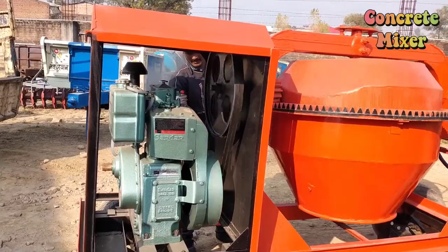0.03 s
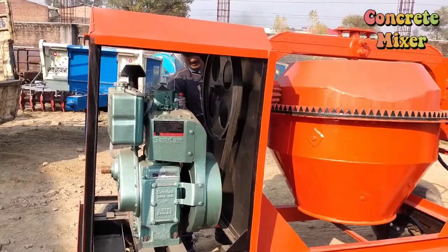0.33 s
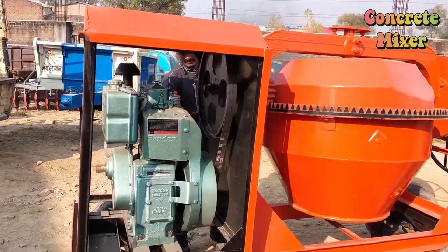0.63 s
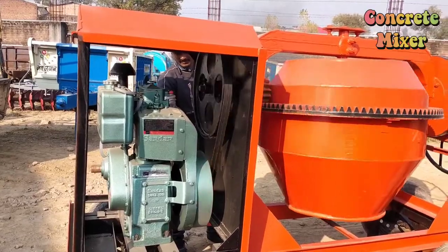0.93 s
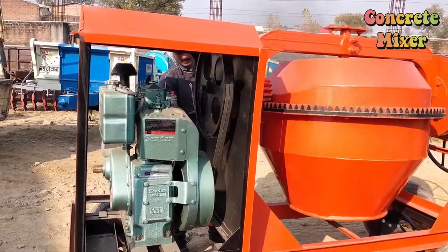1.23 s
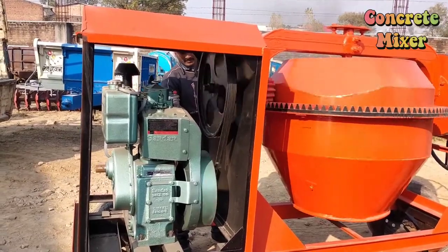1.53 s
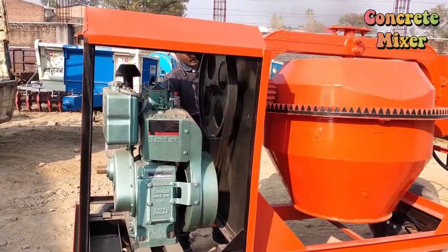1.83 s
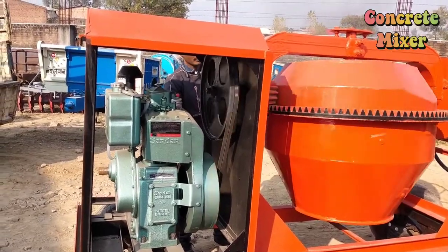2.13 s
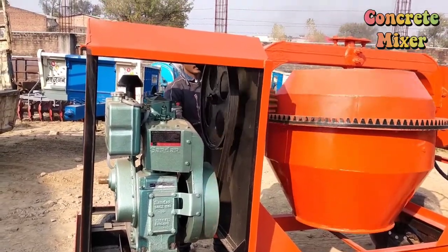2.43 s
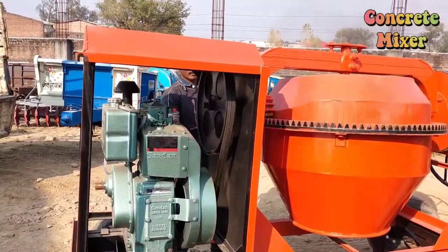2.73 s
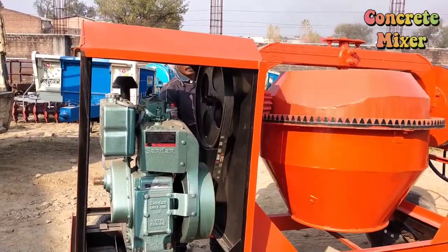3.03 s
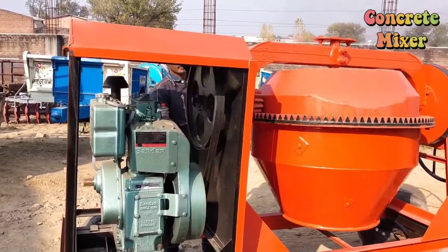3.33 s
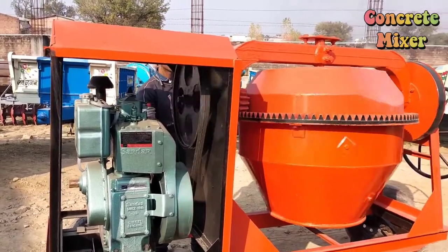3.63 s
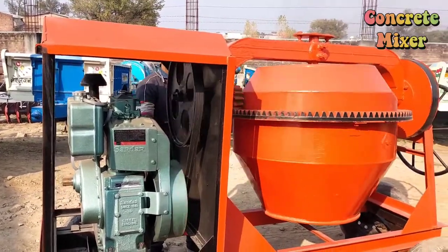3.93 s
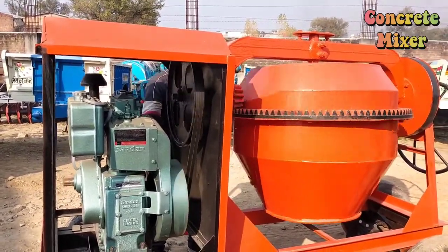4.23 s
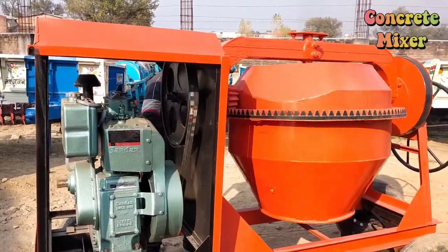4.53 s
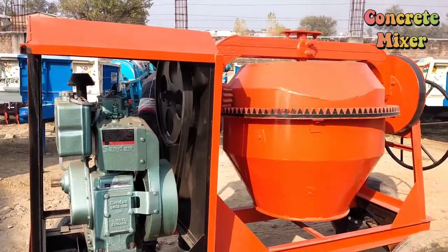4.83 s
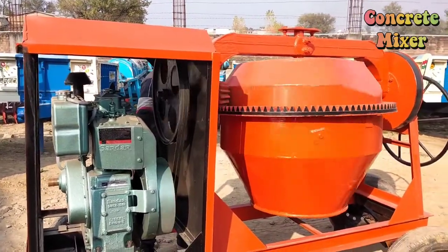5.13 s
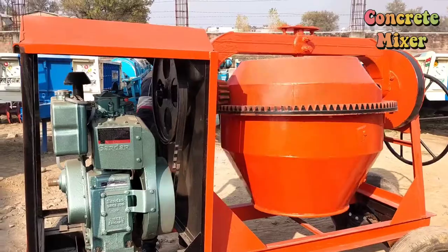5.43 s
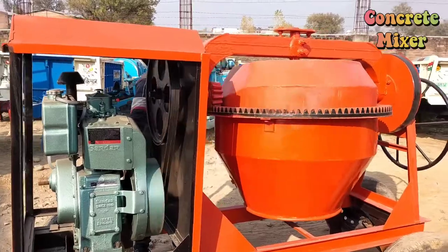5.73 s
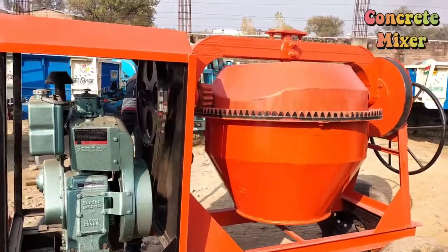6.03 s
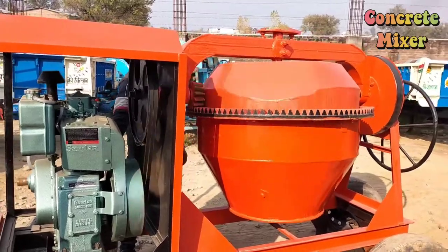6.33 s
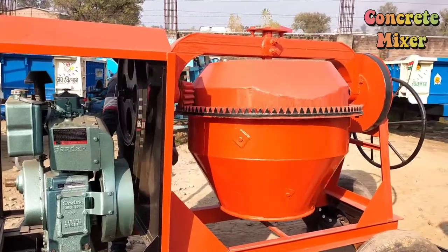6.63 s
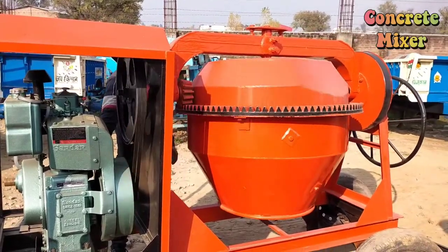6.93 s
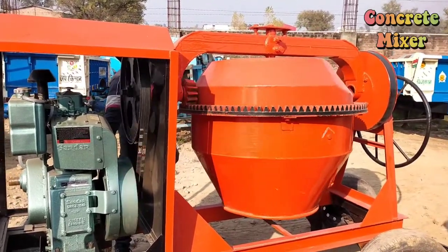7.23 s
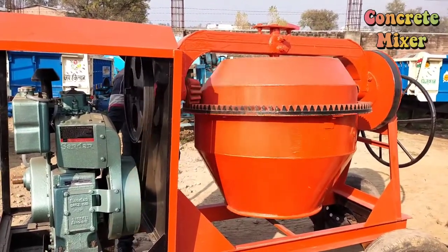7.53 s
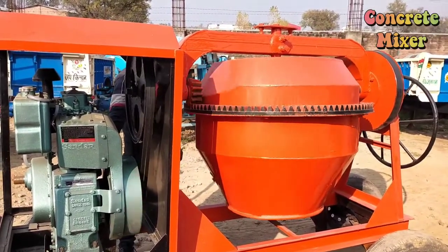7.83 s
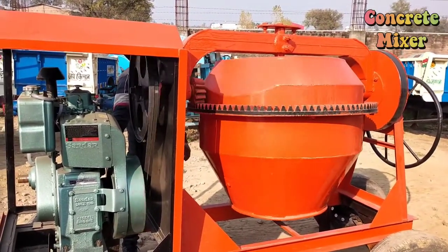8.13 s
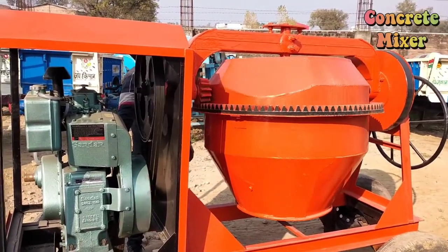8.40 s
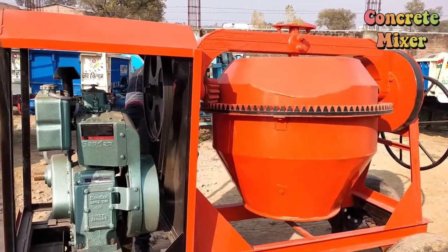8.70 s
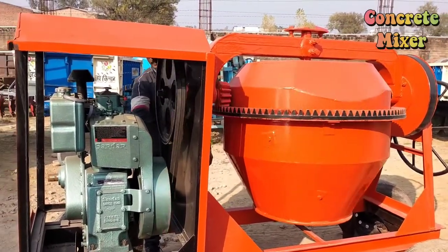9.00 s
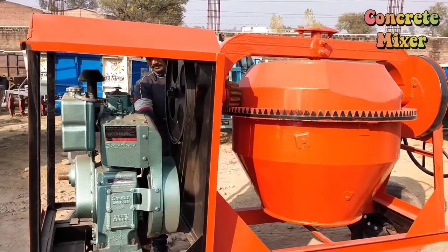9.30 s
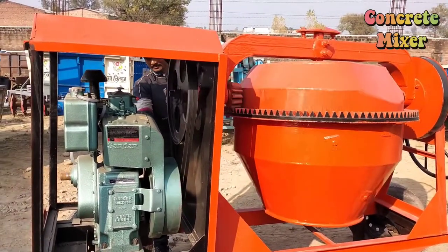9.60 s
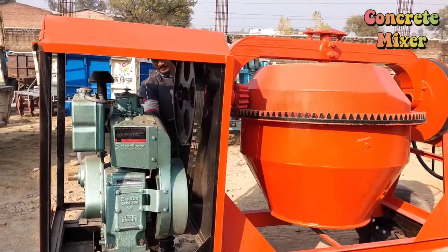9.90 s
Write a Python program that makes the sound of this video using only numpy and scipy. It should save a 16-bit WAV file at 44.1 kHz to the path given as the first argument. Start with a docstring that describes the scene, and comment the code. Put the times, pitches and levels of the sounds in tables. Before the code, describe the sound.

Shrill metal screeching and a quick run of clangs come from a concrete mixer as its drive slips. It settles into a fast rhythm of engine ticks, rasping gears and hollow drum rattle, with occasional harder jolts and slight outdoor echoes. Then the engine cuts out and the machine winds down, growing quieter, with scattered short, high squeaks and slowing ticks over a soft, sinking hum.

```python
"""A single-cylinder diesel drives the empty steel drum of a concrete mixer in an open yard.
At first the drive slips and screeches; it grips at 0.8 s. Each cycle the valves tick twice and the
power stroke jolts the drive, so that the gears grind and set the drum ringing. Firing stops at 5 s:
the mixer coasts, rattling, ticking and squeaking. From 6.5 s a low hum comes up as the engine slows."""
import sys
import numpy as np
from scipy import signal
from scipy.fft import rfft, irfft, next_fast_len
from scipy.io import wavfile

SR = 44100
rng = np.random.default_rng(int(sys.argv[2]) if len(sys.argv) > 2 else 0)


def transcribe(u):
    """Save the signal u as a 16-bit wav file named by the first command-line argument.

    u: samples, shape (n,) or (channels, n), limited to [-1, 1]; the rate is SR.
    q: integer samples, one column per channel.
    """
    v = np.clip(np.atleast_2d(u).T, -1, 1)
    q = np.round(v * 32767).astype(np.int16)
    wavfile.write(sys.argv[1], SR, q)


N = 439236
TIME = np.arange(N) / SR
FIRST_CYCLE_S, FIRING_ENDS_S = .088, 5.0

# Table levels are relative; each layer adds its own gain.
# engine speed: t/s, rate/(cycles/s)
ENGINE_SPEED = [(0.0, 10.62), (0.75, 11.15), (1.6, 10.22), (2.7, 9.79), (3.35, 9.99), (5.0, 10.0),
                (6.8, 7.67), (7.1, 7.53), (7.45, 6.82), (9.96, 3.97)]
# teeth jumping: t/s, length/s, thump/dB, clang/dB, rasp/dB, squeak/dB
HARD_JOLTS = [(0.036, 0.038, -22, -16, -20.5, -26.5), (0.132, 0.036, -24.5, -14, -21, -25.5),
              (0.227, 0.03, -18.5, -14.5, -19.5, -26.5), (0.32, 0.017, -22, -17.5, -20.5, -31),
              (0.408, 0.026, -28.5, -22, -27, -26), (2.212, 0.029, -29, -36, -42, -29),
              (2.313, 0.021, -40, -38, -48, -29.5), (2.621, 0.017, -20.5, -18, -34.5, -28),
              (2.718, 0.021, -27.5, -28.5, -38, -41), (2.924, 0.022, -29.5, -28, -36.5, -38),
              (3.125, 0.03, -26, -27, -44.5, -29.5), (3.224, 0.032, -26.5, -25, -45, -28),
              (3.326, 0.024, -26.5, -24.5, -38.5, -28), (4.426, 0.027, -31.5, -20, -40.5, -26),
              (4.927, 0.024, -27.5, -25.5, -38, -32.5), (6.402, 0.04, -58, -40, -71, -71),
              (6.785, 0.017, -40, -45.5, -50, -53), (7.175, 0.019, -41, -52, -49, -51),
              (7.961, 0.012, -39.5, -54, -58, -48)]
# gear drag of an ordinary power stroke: t/s, clang/dB, squeak/dB
STROKE_DRAG = [(.5, -37, -36), (.68, -41.5, -31.5), (.8, -48.5, -57), (1.9, -55.5, -62.5),
               (2.11, -44.5, -39.5), (3.0, -37.5, -44.5), (3.55, -35, -46), (4.05, -46, -40.5),
               (4.3, -36, -34), (4.55, -35, -43.5), (4.85, -41.5, -39.5)]
# dry contacts: t/s, level/dB, f/Hz
SQUEAK_EVENTS = [(1.419, -34, 5430), (1.699, -37, 6600), (5.612, -36, 4370), (5.943, -33, 4300),
                 (6.08, -24.5, 7650), (6.2053, -37, 7650), (6.6603, -39, 5440), (6.6946, -27.5, 4300),
                 (7.0793, -41.5, 4550), (7.1754, -31, 5130), (7.219, -38, 6460), (7.361, -29.5, 4340),
                 (7.5053, -40, 4460), (7.8072, -44, 6500), (7.9705, -27.5, 6660), (8.3025, -42, 4380),
                 (9.2986, -46, 7700)]
# level curves: t/s, level/dB
RATTLE_LEVEL = [(0.85, -43), (1.2, -47), (2.02, -50), (2.32, -44.5), (3.39, -41.5), (4.1, -43.5),
                (4.48, -41.5), (4.71, -41), (5.87, -49), (6.33, -45.5), (7.14, -49), (7.42, -45),
                (7.7, -48.5), (8.13, -46.5), (8.51, -50.5), (9.96, -54.5)]
VALVE_LEVEL = [(.9, -48), (2, -51.5), (3.6, -45.5), (5.2, -47.5), (8.1, -49), (9, -56.5), (9.96, -57.5)]
HUM_LEVEL = [(6.5, -75), (7.22, -56.5), (8.07, -59.5), (8.21, -53), (8.89, -63), (9.02, -57.5), (9.17, -66),
             (9.88, -60), (9.96, -65)]
# resonances: f/Hz, stage width/Hz, level/dB
DRUM_THUMP_MODES = [(293.6, 32, -2.5), (330, 47, 4.5)]
DRUM_CLANG_MODES = [(640.4, 76, -4.5), (852.7, 76, 3), (1154, 70, -8), (1592, 42, -15)]
DRUM_ROLLING_MODES = [(202, 11, -11.5), (247, 37, -11), (302.3, 25, -1.5), (319.5, 26, 0),
                      (755.7, 65, -7.5), (850, 24.5, -2.5), (1101, 74, -9), (1580, 18, -5),
                      (1690, 66, -18.5), (2486, 330, -25.5)]
GEAR_RASP_MODES = [(616.6, 78, 7), (1670, 470, -11), (2210, 240, -3.5), (2612, 170, 2.5), (2870, 400, -12)]
GEAR_SQUEAK_MODES = [(4212, 210, 2.5), (4580, 63, 5), (4730, 580, -2.5), (5250, 170, -11),
                     (5720, 300, -2.5), (5970, 130, -9.5), (7520, 540, -8.5)]
SCREECH_UPPER_MODES = [(6900, 75, -2), (7424, 140, 3), (7750, 250, -10), (7400, 100, -15.5), (7880, 450, 3)]
SCREECH_LOWER_MODES = [(182, 57, -6), (612, 91, -0.5), (5570, 100, -3), (5070, 90, -14.5), (5740, 390, 5.5)]
VALVE_MODES = [(3330, 350, -8.5), (4260, 830, 1), (5210, 1400, -3.5), (6150, 480, -6), (7620, 780, 2)]
# noise spectra: f/Hz, density/dB
TOOTH_HISS_SPECTRUM = [(300, -13), (1200, -20.5), (3500, -5.5), (5000, 8), (6600, 10), (8200, 12.5),
                       (9000, 4.5), (11000, -3.5), (13000, -5.5), (16000, -14.5)]
RATTLE_SPECTRUM = [(120, -30.5), (200, -7.5), (263, -8), (319, -5.5), (457, -16), (862, -11.5), (995, -11),
                   (1100, -16), (1460, -16), (1590, -9), (1900, -19), (2560, -15.5), (3500, -41.5),
                   (4550, -55.5), (7700, -120)]
BEARING_SPECTRUM = [(2000, -18.5), (3200, -5), (4300, 0), (5200, -4), (6300, 1.5), (7000, -5), (7700, -2.5),
                    (8400, -2), (9500, -41)]
FINE_HISS_SPECTRUM = [(7000, -18.5), (8400, -2.5), (9300, 5), (10500, -3), (13000, -10), (16000, -9)]
RUMBLE_SPECTRUM = [(20, -28), (45, -20.5), (60, -12), (84, 1), (110, -2), (160, -0.5), (220, -7),
                   (400, -29.5)]
TICK_SPECTRUM = [(1500, -12.5), (3300, 2), (4300, -4.5), (5300, 4), (6500, 2), (7700, 6), (8800, 2),
                 (10500, -9.5), (13000, -4.5), (16000, -16.5)]


def jolts(hits):
    """Teeth drag over each other: the drum thumps and clangs, the gears rasp, squeak and hiss."""
    t_s, length_s, thump_db, clang_db, rasp_db, squeak_db, hiss_db = hits
    thump = scrapes(t_s - .004, thump_db, .65 * length_s, DRUM_THUMP_MODES,
                    rise_s=.0051, decay_s=.0025, vary_db=-.5)
    clang = scrapes(t_s - .002, clang_db - .08, .76 * length_s, DRUM_CLANG_MODES,
                    rise_s=.0033, decay_s=.0039, vary_db=2)
    rasp = scrapes(t_s, rasp_db + 2, .95 * length_s, GEAR_RASP_MODES,
                   rise_s=.0056, decay_s=.0034, vary_db=4.5)
    squeak = scrapes(t_s, squeak_db, .9 * length_s, GEAR_SQUEAK_MODES,
                     rise_s=.007, decay_s=.005, vary_db=4.5)
    sliding = bursts(t_s, hiss_db + 10, .97 * length_s, rise_s=.0026, decay_s=.011)
    hiss = sliding * coloured(grit(4600, 1.5, 1), TOOTH_HISS_SPECTRUM)
    return thump + clang + rasp + squeak + hiss


def jolt_schedule(power_phase=.47, stroke_s=.03, slide_db_per_s=303.5):
    """Hard jolts plus an ordinary one for every remaining power stroke, as time-sorted columns."""
    hard, t_s = np.array(HARD_JOLTS), once_a_cycle(power_phase)
    gap_s = np.abs(t_s[:, None] - hard[:, 0]).min(axis=1)
    t_s = t_s[(t_s < FIRING_ENDS_S) & (gap_s > stroke_s)]
    clang_db, squeak_db = curve_at(STROKE_DRAG, t_s)
    levels_db = np.c_[clang_db - 4.5, clang_db, clang_db - 14, squeak_db]
    levels_db += rng.standard_normal(levels_db.shape)
    ordinary = np.c_[t_s, np.full(len(t_s), stroke_s), levels_db]
    rows = np.r_[hard, ordinary]
    t_s, length_s, thump_db, clang_db, rasp_db, squeak_db = rows[np.argsort(rows[:, 0])].T
    # more hiss from long slides and while the drive slips freely
    slip_db = 8 * np.clip(1 - t_s / .45, 0, 1)
    hiss_db = (rasp_db + squeak_db) / 2 - 18.5 + slide_db_per_s * length_s + slip_db
    return t_s, length_s, thump_db, clang_db, rasp_db, squeak_db, hiss_db


def screech(hits, lower_ends_s=.526, grip_s=.817, release_s=.012):
    """Slipping metal sings in mode clusters, louder on each jolt, over hiss and a groan until it grips."""
    t_s, length_s, *_, hiss_db = hits
    load = 1 + bursts(t_s, 20 + .19 * hiss_db, length_s, rise_s=.0019, decay_s=.02)
    prior_stroke_s = t_s[0] - 1 / ENGINE_SPEED[0][1]  # before t = 0, still decaying
    load += bursts([prior_stroke_s], 15, length_s[0], rise_s=.0019, decay_s=.016)
    slipping = np.exp(-np.maximum(TIME - grip_s, 0) / release_s)
    lower_gate = np.exp(-np.maximum(TIME - lower_ends_s, 0) / release_s)
    upper_rub = slipping * fade(-30.5, db_per_s=9.5) * load * rng.standard_normal(N)
    lower_rub = lower_gate * fade(-37.5, db_per_s=4) * load * rng.standard_normal(N)
    upper = band(resonate(upper_rub, SCREECH_UPPER_MODES), 6900, 7930, order=4)
    lower = resonate(lower_rub, SCREECH_LOWER_MODES)
    hiss = fade(-42, db_per_s=23) * coloured(grit(5000, 3.6, .76), FINE_HISS_SPECTRUM)
    groan = fade(-45, db_per_s=9) * resonate(rng.standard_normal(N), SCREECH_LOWER_MODES[:1])
    return upper + lower + slipping * (hiss + groan)


def running_gear(teeth_per_cycle=4):
    """Teeth mesh in step with the engine and keep the drum ringing; bearings hiss, the frame rumbles."""
    level_db, = curve_at(RATTLE_LEVEL, TIME)
    firing = np.clip((FIRING_ENDS_S - TIME) / .17 + 1, 0, 1)
    mesh_db = 2 * np.cos(2 * np.pi * teeth_per_cycle * (engine_cycles() - .06))
    coasting_knock = (1 - firing) * bursts(once_a_cycle(0), 0, .0021, rise_s=.011, decay_s=.0086)
    push = from_db(level_db + mesh_db + 1.83 * drift(25)) * (1 + .5 * coasting_knock)
    drum = from_db(-2) * resonate(push * grit(500, 2.95, .38), DRUM_ROLLING_MODES)
    rattle = from_db(-3) * push * coloured(grit(2500, 2.9, .66), RATTLE_SPECTRUM)
    bearing_db = level_db - 11.5 + 2 * firing + .2 * mesh_db + .83 * drift(66)
    bearings = from_db(bearing_db) * coloured(grit(5400, 1.8, .89), BEARING_SPECTRUM)
    swish = from_db(-66.5) * swell(TIME - 7.8, length_s=.31, rise_s=.31, decay_s=.41)
    fine_gain = np.hypot(from_db(level_db - 30 + 4.5 * firing), swish) * from_db(.3 * mesh_db)
    fine_hiss = fine_gain * coloured(grit(5000, 3, .88), FINE_HISS_SPECTRUM)
    rumble = from_db(level_db - 16.5) * coloured(rng.standard_normal(N), RUMBLE_SPECTRUM)
    return drum + rattle + bearings + fine_hiss + rumble


def squeaks(width_hz=340):
    """Dry contacts touch with a tick, then briefly stick and slip, each at its own pitch."""
    out, age_s = np.zeros(N), TIME[:SR // 8]
    for t_s, level_db, f_hz in SQUEAK_EVENTS:
        rub = swell(age_s, .01, rise_s=.00083, decay_s=.011) * rng.standard_normal(len(age_s))
        ring = unit_rms(resonate(rub, [(f_hz, width_hz, 0)]))
        start = int(t_s * SR)
        out[start:start + len(ring)] += from_db(level_db - 21.5) * ring
    starts_s, levels_db, _ = np.transpose(SQUEAK_EVENTS)
    touch = bursts(starts_s, levels_db - 22, .0056, rise_s=.002, decay_s=.0085)
    return out + touch * coloured(grit(3000, 2.6, .64), TICK_SPECTRUM)


def valves(second_phase=.28, spread_db=1.4):
    """Two valves close per cycle, each with a tick and a tinkle; the second ticks less and rings more."""
    first_s, second_s = once_a_cycle(0), once_a_cycle(second_phase)
    t_s = np.r_[first_s, second_s]
    is_second = np.arange(len(t_s)) >= len(first_s)
    level_db = curve_at(VALVE_LEVEL, t_s)[0] + spread_db * rng.standard_normal(len(t_s))
    level_db += is_second * np.where(t_s < FIRING_ENDS_S, -6.5, -1.5)
    impact = bursts(t_s - .002, level_db - 6.5, .0072, rise_s=.004, decay_s=.013)
    ring_db = level_db - 4 + 4 * is_second
    tinkle = scrapes(t_s, ring_db, .012, VALVE_MODES, rise_s=.003, decay_s=.01, vary_db=6)
    return impact * coloured(grit(4300, 2.6, .99), TICK_SPECTRUM) + tinkle


def hum(start_hz=120.2, sag_hz_per_s=1.9, rise_s=.3):
    """A low, pure hum swells and wavers while its pitch sinks."""
    level_db, = curve_at(HUM_LEVEL, TIME)
    age_s = TIME - HUM_LEVEL[0][0]
    phase_rad = 2 * np.pi * np.cumsum(start_hz - sag_hz_per_s * age_s) / SR
    gain = np.clip(age_s / rise_s, 0, 1) * from_db(level_db + 3.6 + .9 * drift(10))
    return gain * np.sin(phase_rad)


def yard(x):
    """Walls and parked machines add a few dull echoes."""
    dull = band(x, 150, 4000, order=1)
    out = x.copy()
    for delay_s, level_db in [(.019, -17.5), (.037, -25), (.058, -28), (.083, -23)]:
        lag = int(delay_s * SR)
        out[lag:] += from_db(level_db) * dull[:-lag]
    return out


def engine_cycles():
    """Cycles since FIRST_CYCLE_S, per sample."""
    cycles = np.cumsum(curve_at(ENGINE_SPEED, TIME)[0]) / SR
    return cycles - np.interp(FIRST_CYCLE_S, TIME, cycles)


def once_a_cycle(phase):
    """Times/s at which the engine passes a phase (0..1) of its cycle."""
    cycles = engine_cycles()
    passes = np.arange(np.ceil(cycles[0] - phase), cycles[-1] - phase) + phase
    return np.interp(passes, cycles, TIME)


def scrapes(starts_s, levels_db, lengths_s, modes, rise_s, decay_s, vary_db):
    """Each contact rubs a body into ringing with its own mode balance; level and length set the energy."""
    out, friction, age_s = np.zeros(N), grit(5000, 5.75, .7), TIME[:SR // 10]
    for t_s, level_db, length_s in np.broadcast(starts_s, levels_db, lengths_s):
        span = slice(int(t_s * SR), int(t_s * SR) + len(age_s))
        rub = friction[span] * swell(age_s, length_s, rise_s, decay_s)[:len(out[span])]
        varied = [(f_hz, width_hz, db + vary_db * rng.standard_normal()) for f_hz, width_hz, db in modes]
        ring = resonate(rub, varied)
        energy = (length_s + decay_s / 2) * SR
        out[span] += from_db(level_db) * ring * np.sqrt(energy / np.sum(ring ** 2))
    return out


def bursts(starts_s, levels_db, lengths_s, rise_s, decay_s):
    """Envelope of a row of contacts."""
    out = np.zeros(N)
    for t_s, level_db, length_s in np.broadcast(starts_s, levels_db, lengths_s):
        span = slice(max(int(t_s * SR), 0), int(t_s * SR) + SR // 4)
        out[span] += from_db(level_db) * swell(TIME[span] - t_s, length_s, rise_s, decay_s)
    return out


def swell(age_s, length_s, rise_s, decay_s):
    """Linear rise; exponential decay after length_s."""
    return np.clip(age_s / rise_s, 0, 1) * np.exp(-np.maximum(age_s - length_s, 0) / decay_s)


def fade(start_db, db_per_s):
    """Gain falling from t = 0."""
    return from_db(start_db - db_per_s * TIME)


def grit(rate_hz, spread_db, smooth_gain):
    """Tiny random contacts of uneven strength over smooth friction noise; unit RMS."""
    sizes = from_db(spread_db * np.minimum(rng.exponential(1, N), 4)) * rng.choice([-1, 1], N)
    contacts = unit_rms(sizes * (rng.random(N) < rate_hz / SR))
    return unit_rms(contacts + smooth_gain * rng.standard_normal(N))


def drift(rate_hz):
    """Linear glides between standard normal values."""
    knots = rng.standard_normal(4000)
    return np.interp(TIME * rate_hz, np.arange(len(knots)), knots)


def resonate(x, modes):
    """Parallel two-stage resonators; white noise roughly keeps its power."""
    out, power = 0, 0
    for f_hz, width_hz, level_db in modes:
        radius = np.exp(-np.pi * width_hz / SR)
        b = np.array([1, 0, -1]) * (1 - radius ** 2) / 2
        a = [1, -2 * radius * np.cos(2 * np.pi * f_hz / SR), radius ** 2]
        out = out + from_db(level_db) * signal.lfilter(b, a, signal.lfilter(b, a, x + 1e-18))
        power += from_db(level_db) ** 2 * np.pi * width_hz / SR / 2
    return out / np.sqrt(power)


def coloured(x, spectrum):
    """White signal shaped to a spectrum; unit RMS."""
    f_hz, density_db = np.transpose(spectrum)
    size = next_fast_len(N)
    bins_hz = np.maximum(np.arange(size // 2 + 1) * SR / size, 1)
    gain = from_db(np.interp(np.log(bins_hz), np.log(f_hz), density_db, left=-90, right=-90))
    return unit_rms(irfft(rfft(x, size) * gain, size)[:N])


def band(x, low_hz, high_hz, order):
    """Butterworth band-pass."""
    return signal.sosfilt(signal.butter(order, [low_hz, high_hz], "band", fs=SR, output="sos"), x)


def curve_at(rows, t_s):
    """Value columns of a curve, interpolated at t_s."""
    knots_s, *columns = np.transpose(rows)
    return [np.interp(t_s, knots_s, column) for column in columns]


def from_db(db):
    """Decibels to gain."""
    return 10 ** (np.asarray(db) / 20)


def unit_rms(x):
    """Scale to unit power."""
    return x / np.sqrt(np.mean(x ** 2) + 1e-20)


def scene():
    """The mixer in its yard, hum underneath; mono."""
    hits = jolt_schedule()
    contacts = jolts(hits) + screech(hits) + squeaks() + valves()
    return (yard(contacts) + running_gear() + hum())[None]


def record(dry, low_cut_hz=55, ceiling=.88, stopband_hz=16400):
    """Microphone: bass roll-off, soft clipping, steep treble cut."""
    thin = signal.sosfilt(signal.butter(2, low_cut_hz, "high", fs=SR, output="sos"), dry)
    rounded = ceiling * np.tanh(thin / ceiling)
    return signal.sosfilt(signal.cheby2(16, 60, stopband_hz, fs=SR, output="sos"), rounded)


dry = scene()
out = record(dry)
transcribe(out)
```